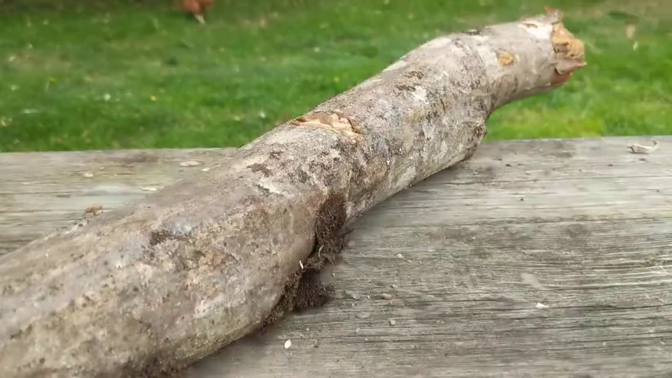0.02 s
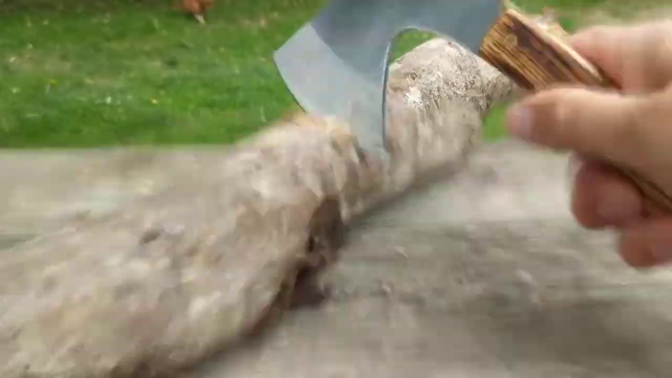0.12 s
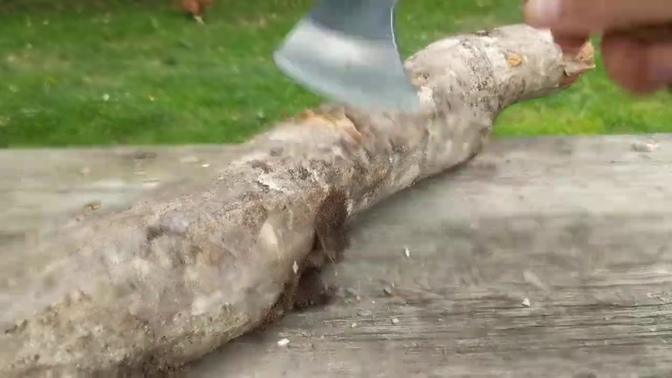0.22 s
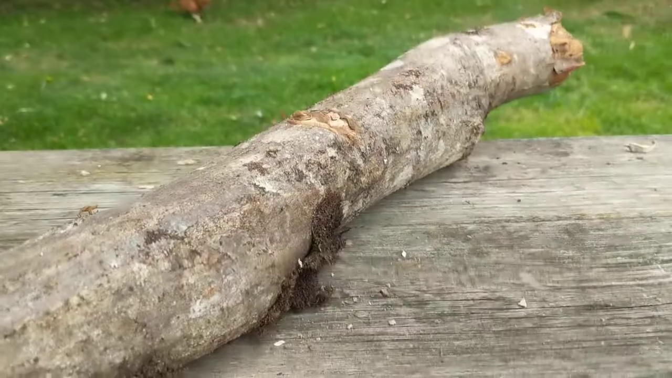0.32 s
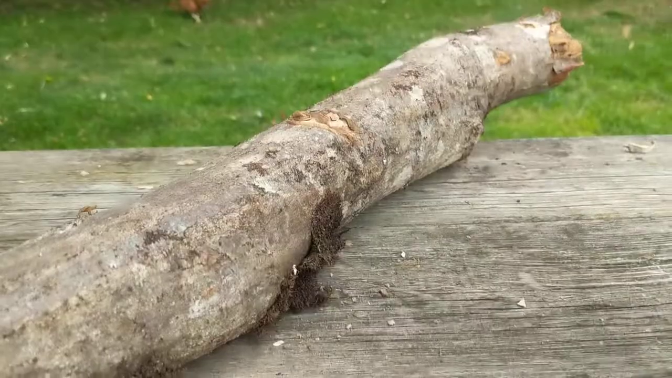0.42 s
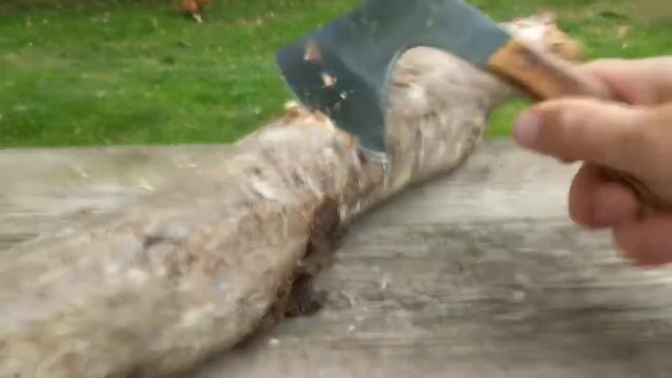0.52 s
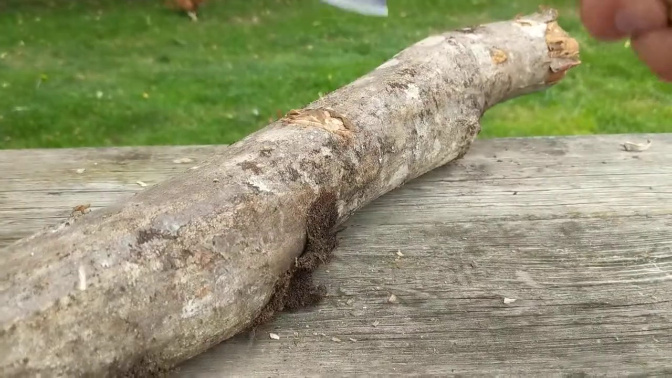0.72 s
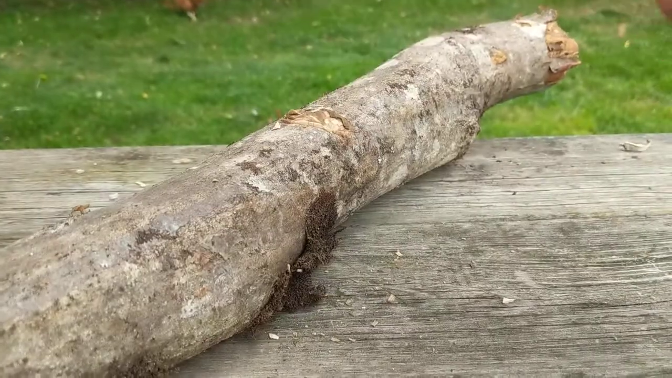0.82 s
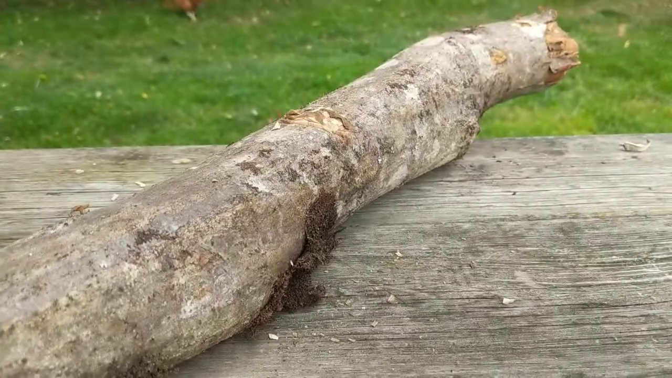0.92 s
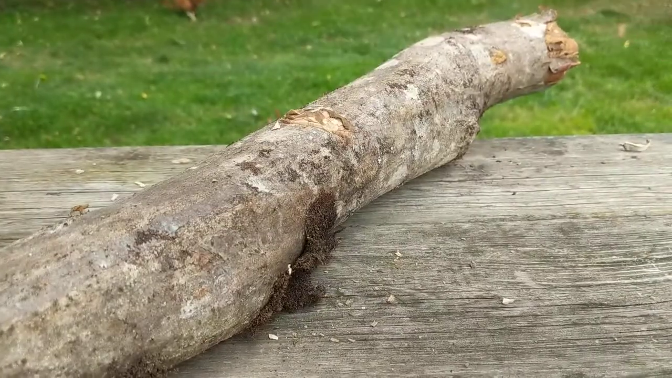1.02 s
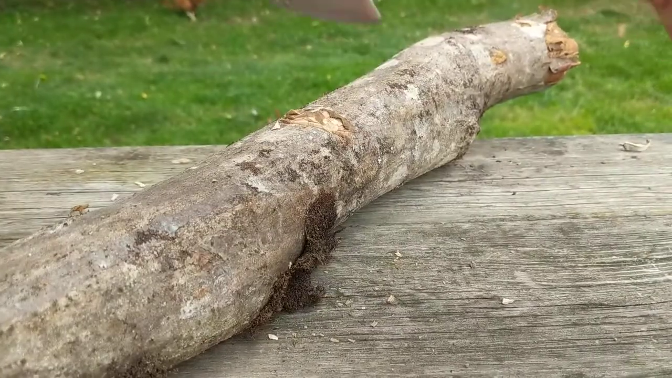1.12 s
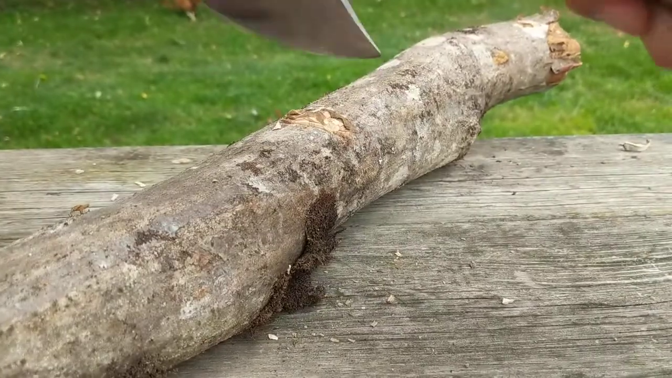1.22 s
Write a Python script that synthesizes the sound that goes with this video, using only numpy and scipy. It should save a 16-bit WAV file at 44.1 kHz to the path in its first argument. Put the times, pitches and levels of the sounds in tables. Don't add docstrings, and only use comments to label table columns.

```python
import sys
import numpy as np
from scipy import signal
from scipy.fft import rfft, irfft, next_fast_len
from scipy.io import wavfile
from scipy.ndimage import uniform_filter1d, map_coordinates

SR = 44100
rng = np.random.default_rng(int(sys.argv[2]) if len(sys.argv) > 2 else 0)


def volts(x):
    e = np.asarray(x, float) / 20
    return 10 ** e


def persist_wave(psi):
    counts = np.round(np.clip(psi, -1, 1) * 32767).astype(np.int16)
    wavfile.write(sys.argv[1], SR, np.atleast_2d(counts).T)


N = 57330
LEAD = SR // 4

# pitch in Hz, level in dB, 60 dB decay in seconds.
BRANCH_MODES = [(714, -20.5, .05), (323.1, -24.5, .1), (478, -13.5, 0.14), (574.8, -15.5, 0.089),
                (770.2, -11, 0.094), (900, -10, .035), (1010.6, -9.5, 0.044), (1311, -27.5, 0.032),
                (1562, -20.5, 0.027), (1785, -10.5, 0.048), (2400, -23, 0.028), (2896, -24, 0.014),
                (3820, -27.5, 0.019), (4010, -27, 0.015)]
# pitch in Hz, level in dB, 60 dB decay in seconds, build-up in seconds.
BENCH_MODES = [(104, -18, .1, .002), (138, -13, 0.15, 0.00043), (172.3, -9.5, 0.085, .001),
               (196, -19.5, 0.058, .001), (252.2, -10, .09, .001)]


def along(points, hz, column=1):
    p = np.array(points, float)
    return np.interp(np.log(hz + 1), np.log(p[:, 0] + 1), p[:, column])


def colour(x, spectrum):
    size = x.shape[-1]
    padded = next_fast_len(size + 8192)
    gain = volts(along(spectrum, np.fft.rfftfreq(padded, 1 / SR)))
    return irfft(rfft(x, padded) * gain, padded)[..., :size]


def noise(spectrum, size, patchy_db=0):
    hz, _, z = signal.stft(rng.standard_normal(size + 512), SR, nperseg=512)
    patches = uniform_filter1d(rng.standard_normal(z.shape), 5, 0)
    patches = uniform_filter1d(patches, 5, 1)
    gain_db = along(spectrum, hz)[:, None] + patchy_db * patches / patches.std()
    x = signal.istft(z * volts(gain_db), nperseg=512)[1][:size]
    return x / x.std()


def ring(modes, t, attack_s=0.00027, sign=-1):
    out = 0
    for k, (hz, db, t60_s, *build_up) in enumerate(modes):
        rise_s = build_up[0] if build_up else attack_s
        scatter_db = 0.6 * rng.normal()
        envelope = volts(db + scatter_db - 60 * t / t60_s) * (1 - np.exp(-t / rise_s))
        out = out + sign ** k * envelope * np.sin(2 * np.pi * hz * t)
    return out


def add(track, s, x):
    i = LEAD + round(s * SR)
    track[i:i + len(x)] += x[:len(track) - i]


def fade(t, end_s):
    edge_s = 0.0081
    return 1 / (1 + np.exp(np.clip((t - end_s) / edge_s, -50, 50)))


def chops():
    # start in seconds, strength in dB, first bite in dB, blade free after seconds, echoes last seconds.
    blows = [
        (-.18, -13, 7, 0.053, .17),
        (.2010, -11.5, 4, 0.069, .152),
        (.5815, -12, -0.5, .062, 0.1334),
    ]
    # delay in seconds, level in dB, sharpness in dB.
    contacts = [
        (0, -8, 5.5),
        (.0014, 2, -1),
        (.0045, -1.5, -7.5),
        (.009, -14, -6.5),
        (.02, -19, -20.5),
        (0.037, -26.5, -23),
    ]
    out, t = np.zeros(LEAD + N), np.arange(SR) / SR
    short = t[:SR // 4]
    for s, db, bite_db, free_s, end_s in blows:
        gain = volts(db + 7)
        for k, (delay_s, level_db, sharp_db) in enumerate(contacts):
            level = gain * volts(level_db + bite_db * (k == 0))
            fibres = volts(-6 + sharp_db) * crush(short)
            add(out, s + delay_s, level * (ring(BRANCH_MODES, short) + fibres))
        bench_lag_s = 0.00075
        add(out, s + bench_lag_s, gain * ring(BENCH_MODES, t, sign=0.96))
        add(out, s, gain * (sway(t) + fade(t, end_s) * rattle(t)))
        add(out, s + free_s, gain * fade(t + free_s, end_s) * blade(t))
        echo_gain = volts(0.4 * bite_db)
        add(out, s, gain * echo_gain * echoes(t, end_s))
    return out[LEAD:]


def crush(t):
    # frequency in Hz, level in dB per Hz.
    fibre_colour = [(710, -33.5), (1200, -6), (1930, 0.5), (2590, -17.5), (3110, -6), (5900, -16),
                    (6720, -9), (14500, -37.5), (16000, -40.5)]
    uneven = volts(6.5 * rng.standard_normal(len(t)))
    burst = colour(rng.standard_normal(len(t)) * uneven, fibre_colour)
    return burst / burst.std() * np.exp(-t / 0.0016) * (1 - np.exp(-t / 0.0003))


def rattle(t):
    # frequency in Hz, level in dB, 60 dB decay in seconds.
    wood = [(80, 1, 0.6), (302, 6, 0.42), (905, 3, 0.24), (2020, -2.5, .06), (5000, -15, 0.15),
            (9950, -24, 0.074), (12500, -51.5, 0.028)]
    hz, s, z = signal.stft(rng.standard_normal(len(t)), SR, nperseg=128)
    t60_s = along(wood, hz, column=2)[:, None]
    level_db = along(wood, hz)[:, None] - 60 * s / t60_s
    x = signal.istft(z * volts(level_db), nperseg=128)[1]
    return volts(-19) * x[:len(t)] * (1 - np.exp(-t / 0.002))


def sway(t):
    # pitch in Hz, level in dB, time to peak in seconds.
    sway_modes = [(58, -18.5, .036), (103, -28.5, .026)]
    # delay in seconds, level in dB, upper mode in dB.
    landings = [
        (.002, -1.5, -12.5),
        (.07, -27, 23.5),
        (0.099, -16.5, 2),
        (0.143, -36.5, 26.5),
        (0.197, -26, 10.5),
        (.26, -33, 10),
    ]
    out = 0
    for delay_s, db, upper_db in landings:
        u = np.maximum(t - delay_s, 0)
        for k, (hz, level_db, peak_s) in enumerate(sway_modes):
            swell = (u / peak_s * np.exp(1 - u / peak_s)) ** 3
            out = out - volts(db + level_db + k * upper_db) * swell * np.sin(2 * np.pi * hz * u)
    return out


def blade(t):
    # pitch in Hz, level in dB, 60 dB decay in seconds, build-up in seconds.
    blade_modes = [(4700, -59, .3, 0.016), (6000, -70, 0.35, 0.02), (7660, -67.5, 0.17, .01),
                   (8320, -51.5, 0.14, 0.0029), (8750, -48.5, 0.13, 0.0021), (9240, -56.5, 0.42, 0.029)]
    return ring(blade_modes, t)


def pings():
    # start in seconds, pitch in Hz, level in dB, 60 dB decay in seconds.
    steel = [
        (.2015, 3020, -17, .022),
        (.204, 4680, -21, .03),
        (.227, 6680, -46, .04),
        (.285, 5880, -58, .15),
        (.583, 4760, -21, .025),
        (.585, 5300, -26, .03),
        (.611, 5250, -45, .04),
        (.714, 7230, -60, .18),
        (.817, 4320, -62, .04),
    ]
    out, t = np.zeros(LEAD + N), np.arange(SR // 4) / SR
    for s, hz, db, t60_s in steel:
        add(out, s, ring([(hz, db, t60_s)], t, attack_s=0.002))
    return out[LEAD:]


def knocks():
    # start in seconds, level in dB, brightness in dB.
    settling = [
        (.36, -34, -16),
        (.685, -34, -6),
        (1.203, -62, 6),
    ]
    out, t = np.zeros(LEAD + N), np.arange(SR // 4) / SR
    for s, db, bright_db in settling:
        dull = ring(BENCH_MODES[2:] + BRANCH_MODES[1:3], t, sign=0.75)
        bright = ring(BRANCH_MODES[3:10], t, attack_s=0.0022)
        add(out, s, volts(db) * (dull + volts(bright_db) * bright))
    return out[LEAD:]


def chips():
    # start in seconds, peak in dB, pitch in Hz, lower mode in dB.
    falling = [(0.0373, -56.5, 4418, -16), (0.1052, -54, 4800, 4.5), (0.1745, -54.5, 4350, -18.5),
               (0.2738, -46, 8320, 5.5), (0.3214, -44.5, 4830, -1.5), (0.398, -43.5, 8390, -25),
               (0.4733, -53, 4540, -5), (0.5397, -57.5, 3900, 2), (0.6015, -40.5, 5140, 1),
               (0.644, -35, 8320, -6), (0.7154, -65, 7160, -10), (0.818, -50, 4330, -17.5),
               (0.9102, -41, 8480, -14.5), (0.9134, -42.5, 7330, -10), (0.9924, -56, 9030, -10),
               (1.0888, -48.5, 8210, -8), (1.207, -53.5, 8616, -3), (1.274, -50.5, 7770, -8.5)]
    out, t = np.zeros(LEAD + N), np.arange(SR // 40) / SR
    for s, db, hz, low_db in falling:
        tick = np.sin(2 * np.pi * hz * t) + volts(low_db) * np.sin(2 * np.pi * 0.66 * hz * t)
        click = volts(-12) * noise([(1500, -26.5), (3000, -5.5), (9000, 4), (10500, -39)], len(t))
        t60_s, attack_s = 0.007, 0.0003
        envelope = volts(db - 3.5 - 60 * t / t60_s) * (1 - np.exp(-t / attack_s))
        add(out, s, envelope * (tick + click))
    return out[LEAD:]


def echoes(t, end_s):
    # frequency in Hz, level in dB per Hz.
    near_colour = [(88, -38.5), (150, -2.5), (893, -24.5), (982, -20.5), (2220, -28), (4660, -31.5),
                   (6940, -38), (8550, -31), (14000, -67.5)]
    # frequency in Hz, level in dB per Hz.
    far_colour = [(500, -40), (880, -16), (960, 4), (1060, -14), (1800, -10), (2300, -18), (4000, -32),
                  (6000, -80)]
    fall_db_per_s, far_s, far_wide_s = 100, 0.228, 0.025
    grains_db = 2 * map_coordinates(rng.standard_normal(len(t) // 100), [t * 150])
    near = volts(-38.5 - fall_db_per_s * t + grains_db) * fade(t, end_s) * (1 - np.exp(-t / 0.015))
    far = volts(-68) * np.exp(-0.5 * ((t - far_s) / far_wide_s) ** 2)
    return near * noise(near_colour, len(t), patchy_db=2.0) + far * noise(far_colour, len(t), patchy_db=5.5)


def air():
    # frequency in Hz, level in dB per Hz.
    hiss_colour = [(150, -37.5), (250, -6), (450, -4.5), (583, -6), (1070, -8), (3010, -15), (7130, -22.5),
                   (8040, -20), (15500, -29)]
    # frequency in Hz, level in dB per Hz.
    rumble_colour = [(15, -36), (25, -2), (59, 4), (91, 0), (135, -20), (259, -13.5), (300, -23),
                     (390, -45.5), (660, -120)]
    hiss = volts(-71.5) * noise(hiss_colour, N, patchy_db=0.4)
    rumble = volts(-66.5) * noise(rumble_colour, N, patchy_db=0.7)
    return hiss + rumble


def scene():
    return (chops() + pings() + knocks() + chips() + air())[None]


def low_pass(x):
    return signal.sosfilt(signal.butter(12, 16830, fs=SR, output="sos"), x)


def record(dry):
    low_cut = signal.butter(2, 42, "high", fs=SR, output="sos")
    x = signal.sosfilt(low_cut, dry)
    ceiling, knee = 0.7, 6
    x = x / (1 + np.abs(x / ceiling) ** knee) ** (1 / knee)
    mix = colour(x, [(15700, 0), (16400, -8), (16800, -50)])
    return low_pass(mix)


dry = scene()
out = record(dry)
persist_wave(out)
```